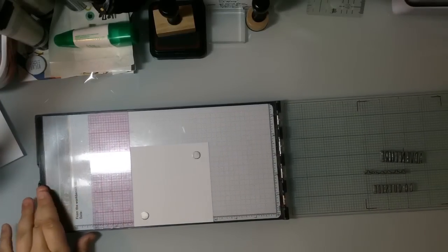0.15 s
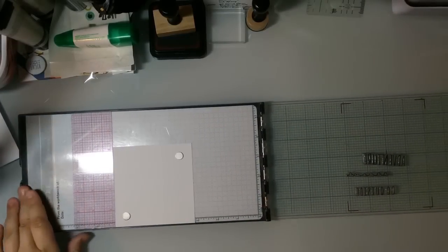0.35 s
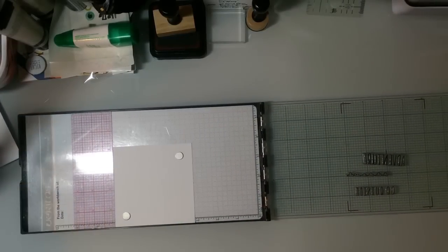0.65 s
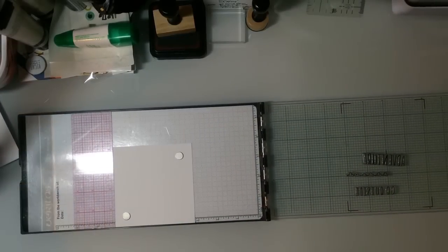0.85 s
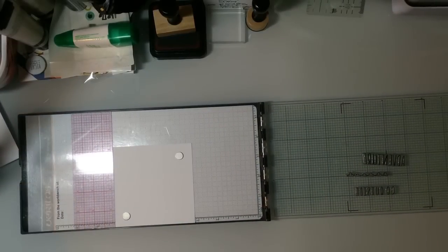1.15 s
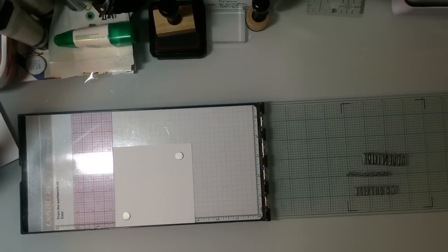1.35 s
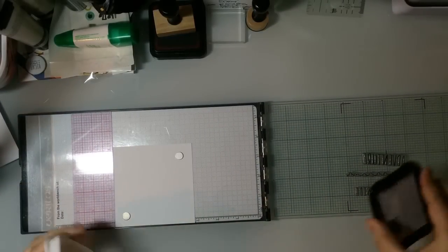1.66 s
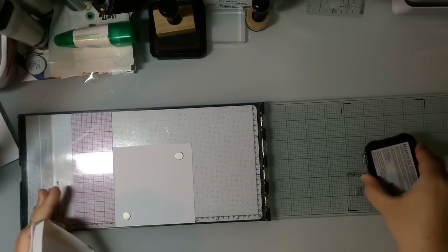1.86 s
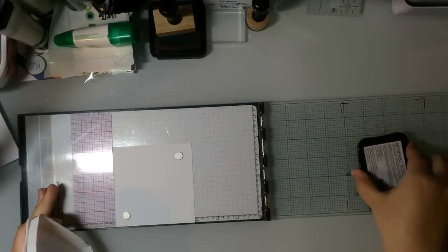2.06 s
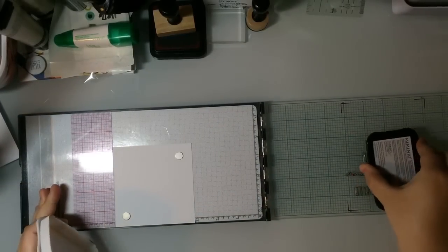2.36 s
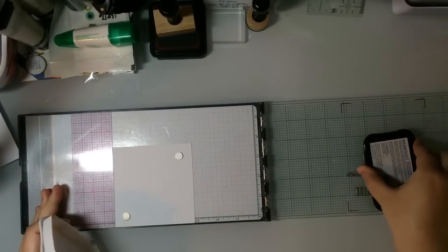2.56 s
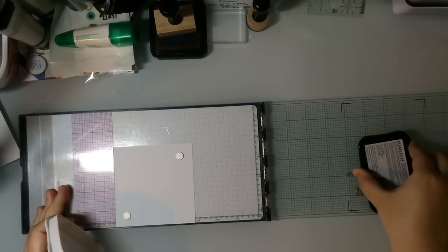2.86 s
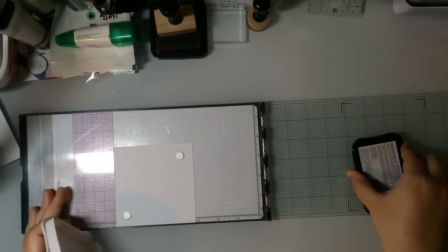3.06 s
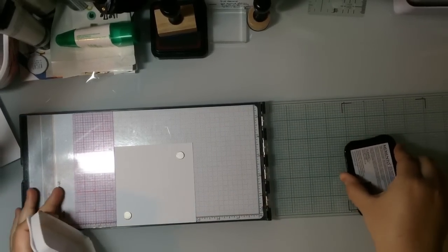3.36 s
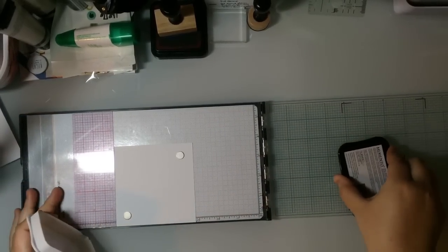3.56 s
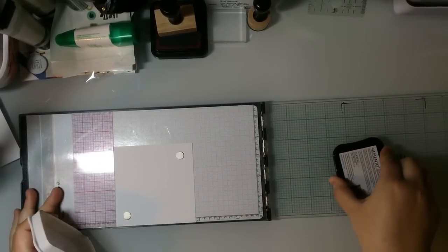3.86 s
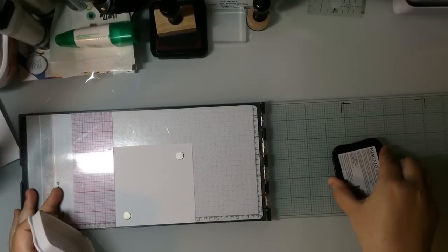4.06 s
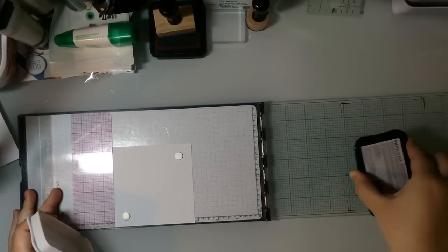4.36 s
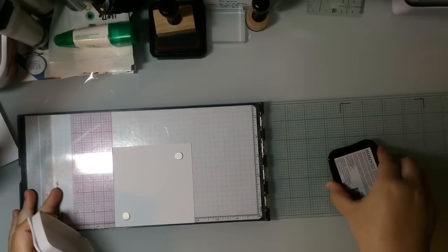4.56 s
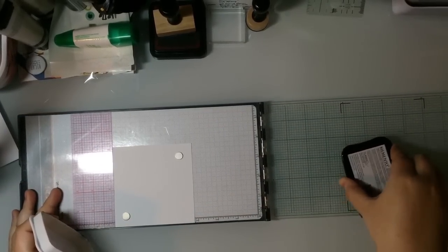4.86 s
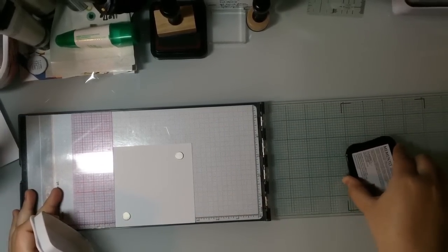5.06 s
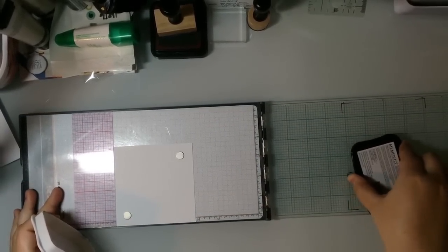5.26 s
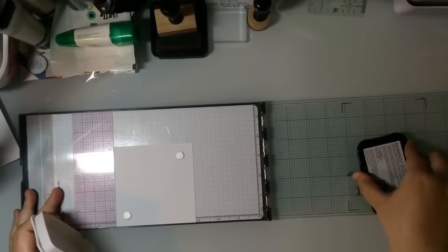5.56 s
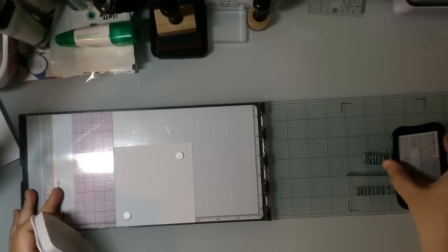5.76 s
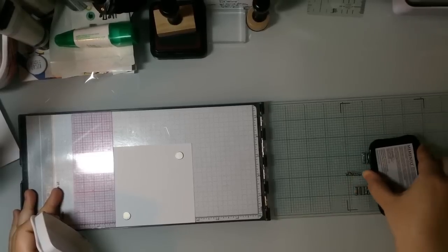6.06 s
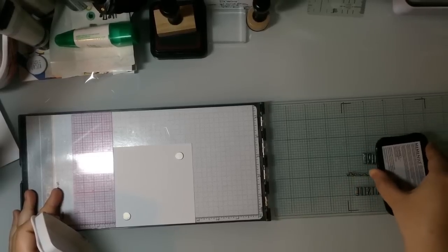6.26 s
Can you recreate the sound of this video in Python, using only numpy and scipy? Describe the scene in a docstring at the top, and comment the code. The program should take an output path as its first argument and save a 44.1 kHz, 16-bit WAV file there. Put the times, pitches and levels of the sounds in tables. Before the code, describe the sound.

Close in a small room, fingers brush plastic and card with tiny squeaks over faint hiss and a brief low hum. A stamping platform knocks hollowly and its lid ticks. Then an ink pad in a plastic case is dabbed repeatedly on stamps, each dab a soft landing, hollow clack and dull desk thud.

```python
"""Over a faint hiss and a low hum that drops after about a second, fingers brush plastic and card and squeak faintly.
A stamping platform knocks hollowly on a desk in a small room, and its hinged lid ticks under the hands.
From half a second on, an ink pad in a plastic case is dabbed onto rubber stamps on the open lid, soon in quick
series: each dab lands softly, then the case clacks and the desk thuds. Light nudges and tacky ink fill the gaps.
Blows are decaying noise cracks and damped modes; rubbing, hum and hiss are shaped noise and a wavering sine."""
import sys
import numpy as np
from scipy import signal
from scipy.fft import rfft, irfft, next_fast_len
from scipy.io import wavfile
from scipy.ndimage import uniform_filter1d, map_coordinates

SR = 44100
rng = np.random.default_rng(int(sys.argv[2]) if len(sys.argv) > 2 else 0)


def wav_record(signal):
    """Record a signal, one row per channel, as 16-bit PCM in the file named by sys.argv[1]."""
    frames = np.transpose(np.atleast_2d(signal))
    bounded = np.clip(frames, -1, 1)
    # unit amplitude maps onto the largest positive 16-bit level
    quanta = np.round(bounded * 32767).astype(np.int16)
    wavfile.write(sys.argv[1], SR, quanta)


N = 282681
AGE = np.arange(SR // 2) / SR  # seconds since a contact

# modes of the desk top: (f/Hz, relative level/dB, t60/s)
DESK_MODES = [(107.7, -11.5, 0.063), (179.7, -1, 0.21), (203.8, 10, 0.063), (262.7, -3.5, 0.18),
              (309.6, 0, 0.08), (374, -12.5, 0.21), (447.6, -2.5, 0.11)]
# deep flexing of the desk top under a firm push: (f/Hz, relative level/dB, t60/s)
PUSH_MODES = [(45.2, -4.5, 0.33), (60.4, -3, 0.26), (89.1, -1, 0.13)]
# colour of hard plastic clicking: (f/Hz, relative level/dB)
CLICK_COLOUR = [(400, -11), (1200, 9.5), (1700, -0.5), (2200, 0.5), (2700, 1.5), (3400, -4), (4000, -9),
                (5100, -5.5), (6500, -16.5), (7600, -25.5), (10000, -25), (15000, -37.5)]
# colour of a hollow plastic shell: (f/Hz, relative level/dB)
HOLLOW_COLOUR = [(150, -7), (400, 4), (530, -1.5), (720, 1.5), (1250, -5.5), (1450, -7), (1700, -2),
                 (2200, -22), (3000, -22), (6000, -35), (15000, -48.5)]
# colour of a sharp plastic edge, also lent to the parting ink: (f/Hz, relative level/dB)
TICK_COLOUR = [(500, -140), (1500, 4.5), (2400, -4), (3300, 2.5), (4000, -4), (5000, -3), (6500, -7.5),
               (7800, -24), (15000, -48)]

USUAL_DB, USUAL_CLICK_DB = -28, -16  # level and hardness of an ordinary dab


def amp(db):
    """Decibels to gain."""
    return 10 ** (np.asarray(db) / 20)


def unit(x):
    """Scale to rms 1."""
    return x / np.sqrt(np.mean(x ** 2) + 1e-20)


def unit_blow(x):
    """Scale to the energy of 10 ms at rms 1."""
    return x / np.sqrt(np.sum(x ** 2) / (SR / 100) + 1e-20)


def along(points, hz):
    """Interpolate (Hz, value) points on a log frequency axis."""
    f, v = np.transpose(points)
    return np.interp(np.log(hz + 1), np.log(f + 1), v)


def level(rows):
    """(s, dB) points to one gain per sample."""
    return amp(np.interp(np.arange(N) / SR, *np.transpose(rows)))


def wobble(rate):
    """A smooth random curve with rate knots a second."""
    knots = rng.standard_normal(int(N * rate / SR) + 4)
    return map_coordinates(knots, [np.arange(N) * rate / SR])


def filtered(x, response):
    """Shape x by a gain that is a function of frequency."""
    m = next_fast_len(N + SR // 2)
    return irfft(rfft(x, m) * response(np.fft.rfftfreq(m, 1 / SR)), m)[:N]


def noise(spectrum):
    """Steady coloured noise of rms 1."""
    return unit(filtered(rng.standard_normal(N), lambda hz: amp(along(spectrum, hz))))


def strokes(rows, rise_share):
    """Gain of strokes that swell by 20 dB over the first share of their length and fade as far over the rest."""
    t = np.arange(N) / SR
    gain = np.zeros(N)
    for s, db, length in rows:
        rise = (s - t) / rise_share
        fall = (t - s) / (1 - rise_share)
        gain += amp(db - 20 * np.maximum(rise, fall) / length)
    return gain


def crack(spectrum, t60, corner_hz=SR, attack=0.00015):
    """A brief chatter of two hard surfaces, coloured causally; a softer contact has a lower corner."""
    n = len(AGE)
    hz = np.fft.rfftfreq(n, 1 / SR)
    # folding the cepstrum forward makes the colouring minimum-phase: nothing sounds before the contact
    cepstrum = irfft(np.log(amp(along(spectrum, hz)) / np.hypot(1, (hz / corner_hz) ** 2)), n)
    cepstrum[1:n // 2] *= 2
    cepstrum[n // 2 + 1:] = 0
    envelope = amp(-60 * AGE / t60) * (1 - np.exp(-AGE / attack))
    chatter = rfft(rng.standard_normal(n) * envelope)
    chatter /= uniform_filter1d(abs(chatter), size=101)  # the contact drives all frequencies alike
    coloured = irfft(chatter * np.exp(rfft(cepstrum)), n)
    return unit_blow(coloured * (AGE < AGE[-1] / 2))


def ring(modes, attack, scatter_db, detune):
    """Damped modes of alternating sign, whose strength and pitch shift with the place of the blow."""
    hz, db, t60 = np.transpose(modes)[:, :, None]
    size, shift = rng.standard_normal((2, len(modes), 1))
    sign = (-1) ** np.arange(len(modes))[:, None]
    decay = amp(db + scatter_db * size - 60 * AGE / t60)
    waves = sign * decay * np.sin(2 * np.pi * hz * (1 + detune * shift) * AGE)
    return unit_blow(waves.sum(0) * (1 - np.exp(-AGE / attack)))


def in_room(x, wet_db, blur_s=0.000086):
    """A blow with its dulled early reflections and a fresh diffuse tail."""
    # decay of the small room: (f/Hz, t60/s)
    room_decay = [(80, 0.23), (210, 0.46), (560, 0.13), (1500, 0.22), (4000, 0.18), (10000, 0.17)]
    # reflections from near surfaces: (delay/s, gain)
    near_walls = [(.0058, 0.083), (.0095, 0.26), (.018, 0.078)]
    hz, t, z = signal.stft(rng.standard_normal(len(AGE)), SR, nperseg=256)
    decay = amp(-60 * t / along(room_decay, hz)[:, None])
    tail = signal.istft(z * decay, SR, nperseg=256)[1][:len(AGE)]
    tail *= 1 - np.exp(-(AGE / 0.0067) ** 2)  # the tail builds up over some 7 ms
    response = amp(wet_db) * tail / np.linalg.norm(tail)
    response[0] += 1  # direct sound
    for delay, gain in near_walls:
        echo = np.exp(-((AGE - delay) / blur_s) ** 2)  # clutter scatters the treble
        response += gain * echo / echo.sum()
    return signal.fftconvolve(x, response)[:len(AGE)]


def add(track, s, sound):
    """Mix a sound into the track at time s."""
    part = track[max(round(s * SR), 0):][:len(sound)]
    part += sound[:len(part)]


def background(hum_hz=85):
    """Steady hiss of air-coloured noise under a sine hum that wavers in pitch and strength."""
    # colour of the room air and hiss: (f/Hz, relative level/dB)
    air_colour = [(12, -56), (20, -29.5), (59, -3.5), (97, 0), (124, -2), (160, -12), (421, -17),
                  (713, -21.5), (774, -19.5), (889, -23.5), (1830, -26.5), (2930, -30.5), (4560, -30.5),
                  (15000, -36)]
    # course of the low hum: (t/s, level/dB)
    hum_course = [(0, -64.5), (1.1, -70), (1.3, -84), (6.41, -78)]
    phase = 2 * np.pi * np.cumsum(hum_hz + 3 * wobble(7)) / SR
    hum = level(hum_course) * unit(np.sin(phase) * amp(2 * wobble(12)))
    return amp(-69.0) * noise(air_colour) + hum


def rubbing():
    """Skin and plastic slide with an uneven grip: coloured noise under swelling strokes and quick flutter."""
    # finger strokes over plastic and card: (t of fastest moment/s, level/dB, length/s)
    finger_strokes = [(.02, -75.5, 0.25), (.33, -72, 0.045), (.39, -67, 0.34), (.86, -69, .17),
                      (.99, -76, 0.2), (1.18, -68, 0.11), (1.545, -53, 0.046), (1.77, -73, 0.55)]
    # dull scuffs of platform and pad: (t of fastest moment/s, level/dB, length/s)
    dull_scuffs = [(.04, -60.5, 0.25), (1.466, -56, .075), (4.85, -70.5, 0.28)]
    # colour of skin on plastic and card: (f/Hz, relative level/dB)
    finger_colour = [(300, -36), (650, -9), (860, 9.5), (1200, 0.5), (2600, -5.5), (3450, -6), (4300, -3.5),
                     (6000, -0.5), (9000, -7.5), (15000, -5)]
    # colour of the scuffs: (f/Hz, relative level/dB)
    rub_colour = [(300, -9), (900, -3.5), (1500, -2.5), (1900, -0.5), (2300, -7.5), (3100, -12),
                  (7000, -30), (15000, -48)]
    brush = strokes(finger_strokes, rise_share=0.42) * noise(finger_colour) * amp(2.5 * wobble(120))
    scuff = strokes(dull_scuffs, rise_share=0.25) * noise(rub_colour) * amp(1.8 * wobble(70))
    return brush + scuff


def squeaks(half_width=0.1):
    """Tiny slips of gripping skin, as noise, excite one narrow resonance; half_width is a share of its pitch."""
    # faint squeaks: (t of fastest moment/s, level/dB, length/s, f/Hz)
    skin_squeaks = [(0.06, -65.5, 0.31, 1840), (0.326, -65.5, .05, 3530), (.38, -66, 0.056, 3470),
                    (0.875, -72, 0.17, 860), (1.177, -72, .08, 790), (4.858, -74, .38, 1830)]
    track = np.zeros(N)
    for s, db, length, pitch_hz in skin_squeaks:
        slips = rng.standard_normal(N)
        tone = filtered(slips, lambda hz: 1 / (1 + ((hz / pitch_hz - 1) / half_width) ** 2))
        track += strokes([(s, db, length)], rise_share=0.52) * unit(tone)
    return track


def knocks(push_db=-13, rebound_s=0.0232):
    """The platform's edge drops on the desk: a few hollow cycles, a low ring, and the lid ticks as it falls back."""
    # drops of the platform: (t/s, nominal level/dB, nominal level of the rebounding lid/dB)
    platform_drops = [(.0525, -30.5, -76), (.977, -53.5, -72), (1.073, -61, -80), (2.4146, -28.5, -49),
                      (2.707, -25.5, -43), (2.9744, -25.5, -38.5)]
    # modes of the platform: (f/Hz, relative level/dB, t60/s)
    platform_modes = [(84.7, -32.5, 0.23), (145.4, -13, 0.21), (202.5, -21, 0.14), (312, -9.5, 0.021),
                      (880, 5.5, 0.012), (1069, -3.5, 0.012)]
    track = np.zeros(N)
    for s, db, rebound_db in platform_drops:
        knock = ring(platform_modes, attack=0.0012, scatter_db=1, detune=0.01)
        edge = amp(-22.0) * crack(CLICK_COLOUR, t60=0.036)
        edge += amp(-11.5) * crack(HOLLOW_COLOUR, t60=0.093)
        push = amp(push_db) * ring(PUSH_MODES, attack=0.004, scatter_db=9, detune=0.026)
        add(track, s, amp(db - 9) * in_room(knock + edge + push, wet_db=-10.5))
        add(track, s + rebound_s, tick(rebound_db, body_db=-0.5, snap_db=-60))
    return track


def tick(db, body_db, snap_db):
    """A hard plastic edge catches and lets go, with a small jolt to the desk."""
    # colour of the highest snap: (f/Hz, relative level/dB)
    snap_colour = [(3000, -8), (6000, 5.5), (8600, -3.5), (10000, -13), (15000, -19)]
    # modes of the ticking lid: (f/Hz, relative level/dB, t60/s)
    lid_modes = [(730, -4.5, 0.019), (820, 3.5, 0.023), (1051, -5, 0.043), (1250, 0.5, 0.014),
                 (1653, -4.5, 0.015)]
    edge = amp(-11.5) * crack(TICK_COLOUR, t60=0.016)
    edge += amp(snap_db - 1.5) * crack(snap_colour, t60=0.013)
    body = amp(body_db - 3.5) * ring(lid_modes, attack=0.00066, scatter_db=0.5, detune=0.039)
    body += amp(body_db - 12.5) * crack(HOLLOW_COLOUR, t60=0.05)
    jolt = amp(body_db - 11) * ring(DESK_MODES, attack=0.0022, scatter_db=3.5, detune=0.1)
    return amp(db) * (in_room(edge + body, wet_db=-9) + jolt)


def ticks():
    """The lid and the case tick under the hands: short cracks over a ringing plastic body."""
    # sharp ticks: (t/s, nominal level/dB, body ring re level/dB, high snap re level/dB)
    plastic_ticks = [(0.3974, -37, -4, -42), (1.5412, -41.5, -4.5, -22), (1.93, -60, -32, -16),
                     (2.4506, -44.5, -5, -24), (2.7712, -38.5, -2.5, -47), (2.7966, -44, -1, -40),
                     (2.8245, -34.5, -12.5, -25), (2.8476, -50, -2, -13), (6.156, -30.5, -4.5, -9.5)]
    track = np.zeros(N)
    for s, db, body_db, snap_db in plastic_ticks:
        add(track, s, tick(db, body_db, snap_db))
    return track


def touch(tap_db, thud_db):
    """The soft pad or a finger lands: dull and slow to rise, with hardly any click."""
    tap = crack(HOLLOW_COLOUR, t60=0.03, attack=0.0038)
    tap += amp(-15.5) * crack(CLICK_COLOUR, t60=0.0092, attack=0.003)
    thud = ring(DESK_MODES, attack=0.004, scatter_db=-0.5, detune=0.012)
    thud *= amp(-60 * AGE / 0.14)  # the resting pad or finger damps the desk
    return in_room(amp(tap_db - 8.0) * tap + amp(thud_db + 2) * thud, wet_db=-13)


def pad_squash(squash_s):
    """The felt grazes the stamp, then compresses: a brief rustle swells until the case lands, holds for 3 ms
    and stops."""
    envelope = np.clip(AGE / squash_s, 0, 1) * (AGE < squash_s + 0.003)
    return unit_blow(crack(HOLLOW_COLOUR, t60=0.0275) * envelope)


def case_clack(spot_hz):
    """The struck spot rings briefly along with the hollow plastic case."""
    # modes of the case: (f/Hz, relative level/dB, t60/s)
    case_modes = [(678, -2.5, 0.053), (799, -1, 0.0075), (875, -23.5, 0.019), (1032, 8, 0.019),
                  (1218, -34.5, 0.032), (1260, -11.5, 0.029), (1567, 9, 0.012), (1980, -8.5, 0.06),
                  (2497, -17, 0.07), (3030, -32, 0.0144)]
    spot = ring([(spot_hz, 0, 0.017)], attack=0.00072, scatter_db=1.5, detune=0.016)
    case = ring(case_modes, attack=0.0027, scatter_db=-1.0, detune=0.026)
    shell = crack(HOLLOW_COLOUR, t60=0.046)
    return amp(-15.5) * spot + amp(-21) * case + amp(-17.5) * shell


def rim_click(click_db):
    """A harder landing clicks louder and brighter and rings the case's rim."""
    # high modes of the rim: (f/Hz, relative level/dB, t60/s)
    rim_modes = [(2568, 6, 0.0087), (2684, -6.5, 0.057), (3100, -12.5, 0.023), (4740, -13, 0.025),
                 (5216, -0.5, 0.0096)]
    # 1500 Hz for a soft contact, plus 2800 Hz for an ordinary one; that part doubles per 2.5 dB of hardness
    corner_hz = 1500 + 2800 * 2 ** ((click_db - USUAL_CLICK_DB) / 2.5)
    click = amp(click_db - 0.5) * crack(CLICK_COLOUR, t60=0.013, corner_hz=corner_hz)
    rim = ring(rim_modes, attack=0.00035, scatter_db=3.0, detune=0.026)
    return click + amp(click_db - 14.5) * rim


def dab_thud(thud_db, rocking_db, click_db, push_db=-5.5):
    """The desk thuds, the platform rocks on its feet, and a harder landing flexes the desk top more."""
    # the whole platform rocking: (f/Hz, relative level/dB, t60/s)
    rocking_modes = [(144.4, 0, 0.2)]
    thud = amp(thud_db) * ring(DESK_MODES, attack=0.0021, scatter_db=1.0, detune=0.0169)
    thud += amp(rocking_db) * ring(rocking_modes, attack=0.0023, scatter_db=1, detune=0.0047)
    flex_db = thud_db + push_db + click_db - USUAL_CLICK_DB
    thud += amp(flex_db) * ring(PUSH_MODES, attack=0.0011, scatter_db=5.0, detune=0.03)
    return thud


def dabs(squash_db=-25, graze_s=0.0044, pad_tap_db=-15.5, settle_s=0.019, settle_db=-22.5):
    """The pad lands and squashes, the case clacks, the desk thuds, and the case chatters once more as it beds down."""
    # dabs on the stamps: (t of case landing/s, nominal level/dB, lead of the soft pad/s,
    #   pad's thud re the case's/dB, hardness as click re level/dB, rocking re level/dB, struck spot f/Hz)
    pad_dabs = [(0.542, -39.5, 0.0078, -26, -26.5, -12.5, 660), (2.1252, -51, .002, -16, -19, -3.5, 1000),
                (2.547, -42, 0.0086, 3.5, -18, -4, 830), (2.8284, -29.5, 0.0027, -27, -13.5, -14, 826),
                (3.084, -28.5, 0.014, 9.5, -16, -9, 1065), (3.3687, -21.5, 0.0053, -3.5, -12.5, -23, 750),
                (3.612, -30.5, 0.0087, -2.5, -16, -17.5, 876), (3.805, -31.5, 0.0032, -10, -17, -45, 790),
                (3.973, -30.5, 0.0076, -3, -30, -10.5, 810), (4.145, -30, 0.0091, -3, -27, -14.5, 802),
                (4.713, -28.5, .016, 4, -15, -24.5, 810), (5.038, -20, 0.00413, 0.5, -12.5, -21, 704),
                (5.219, -24, 0.012, -1, -17, -13.5, 1145), (5.353, -27, 0.0083, -1, -27, -27.5, 820),
                (5.492, -25.5, 0.0088, -11, -18.5, -15.5, 1303),
                (5.643, -26.5, 0.0068, -6, -16, -19.5, 1277), (6.153, -27.5, 0.0017, -14, -12, -8.5, 666)]
    track = np.zeros(N)
    for s, db, lead_s, pad_db, click_db, rocking_db, spot_hz in pad_dabs:
        thud_db = -42.5 + 0.58 * (db - USUAL_DB)  # the thud gains 0.58 dB for each dB of the blow
        clack = in_room(case_clack(spot_hz), wet_db=-9)
        click = in_room(rim_click(click_db), wet_db=-9.5)
        thud = in_room(dab_thud(thud_db - db, rocking_db, click_db), wet_db=-17)
        add(track, s, amp(db) * (clack + click + thud))
        settle = crack(HOLLOW_COLOUR, t60=0.029, attack=0.002)
        add(track, s + settle_s * rng.uniform(0.6, 1.4), amp(db + settle_db) * settle)
        add(track, s - lead_s, touch(db + pad_tap_db, thud_db + pad_db))
        squash_s = lead_s + graze_s
        add(track, s - squash_s, amp(db + squash_db) * pad_squash(squash_s))
    return track


def nudges():
    """Fingers land lightly on the platform: soft taps with a damped desk thud."""
    # light landings: (t/s, nominal level/dB, thud re level/dB)
    finger_nudges = [(1.341, -57.5, -7.5), (1.457, -57, -1.5), (2.197, -58, -4), (2.585, -53.5, -15),
                     (3.509, -60, 4.5), (3.946, -60.5, 11.5), (6.281, -60, 0)]
    track = np.zeros(N)
    for s, db, thud_db in finger_nudges:
        add(track, s, touch(db, db + thud_db))
    return track


def peeling(rate=900):
    """Threads of tacky ink let go of the rubber in a fine, dense crackle of random impulses, rate a second."""
    # pulls of the ink: (t of strongest pull/s, level/dB, length/s)
    ink_pulls = [(2.445, -55.5, 0.045), (2.8, -56, 0.07), (3.02, -67.5, 0.12)]
    parting = rng.random(N) < rate / SR
    size = amp(1.4 * rng.standard_normal(N)) * rng.choice([-1, 1], N)
    crackle = filtered(parting * size, lambda hz: amp(along(TICK_COLOUR, hz)))
    return strokes(ink_pulls, rise_share=0.14) * unit(crackle)


def scene():
    """Everything on the desk and the room around it, in one channel."""
    handling = rubbing() + squeaks() + knocks() + ticks()
    stamping = dabs() + nudges() + peeling()
    return (background() + handling + stamping)[None]


def record(dry, top_hz=15330):
    """Nothing above the band limit is kept."""
    return np.array([filtered(channel, lambda hz: hz < top_hz) for channel in dry])


dry = scene()
out = record(dry)
wav_record(out)
```